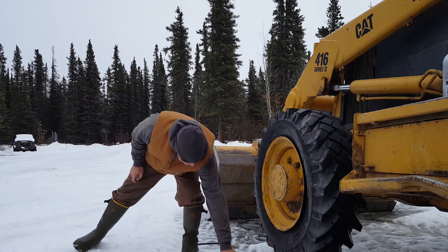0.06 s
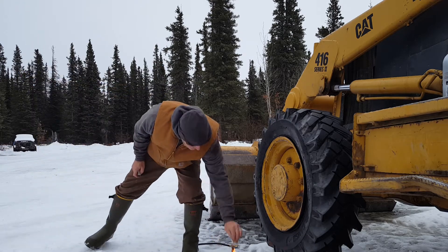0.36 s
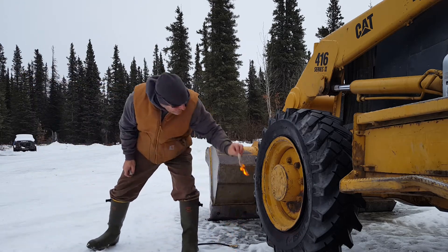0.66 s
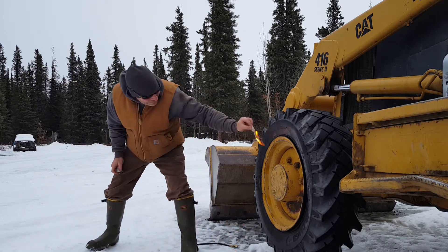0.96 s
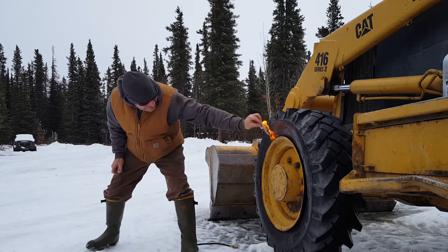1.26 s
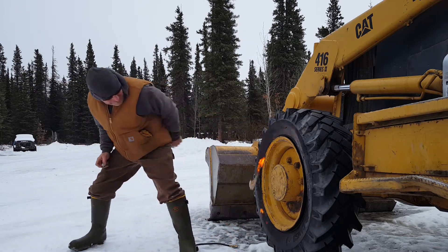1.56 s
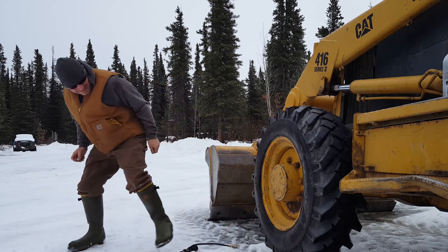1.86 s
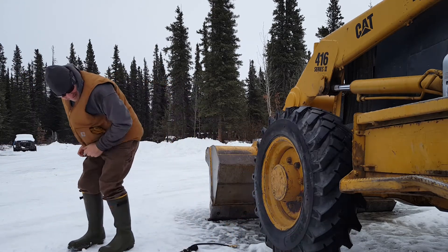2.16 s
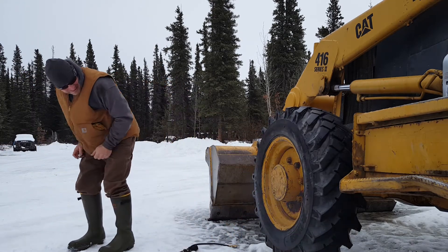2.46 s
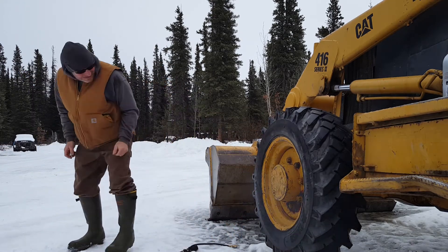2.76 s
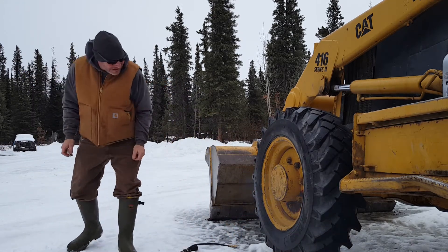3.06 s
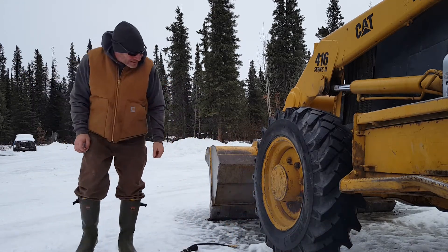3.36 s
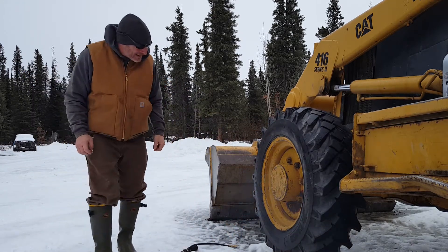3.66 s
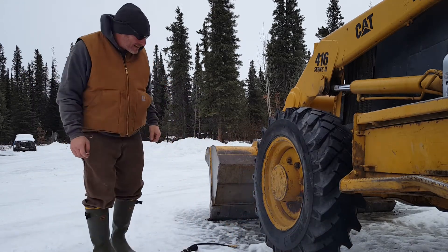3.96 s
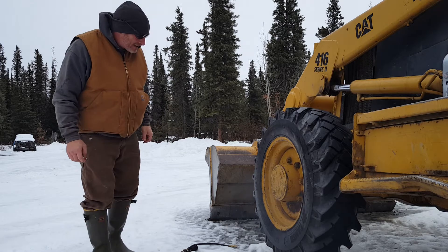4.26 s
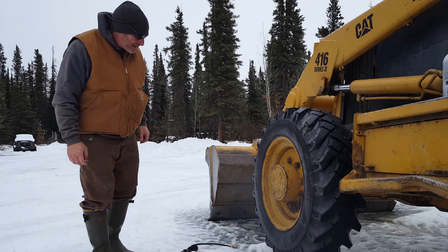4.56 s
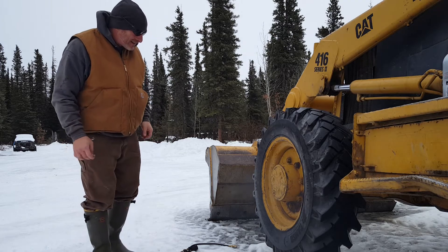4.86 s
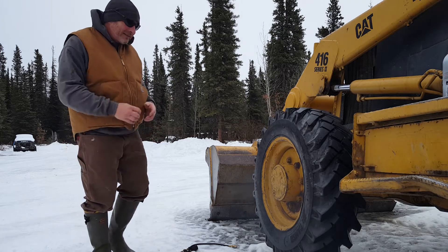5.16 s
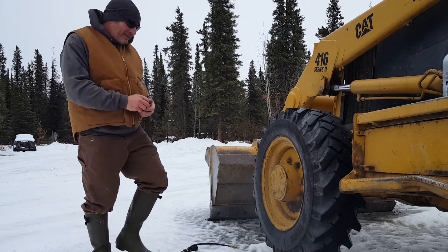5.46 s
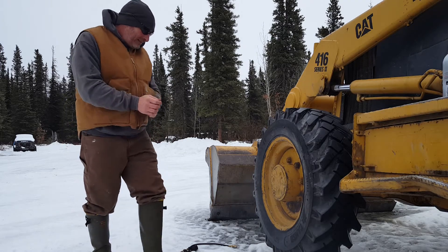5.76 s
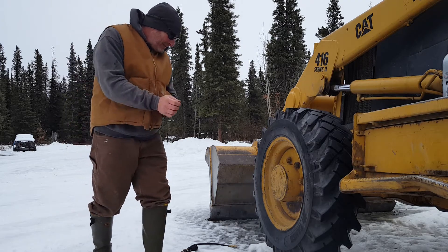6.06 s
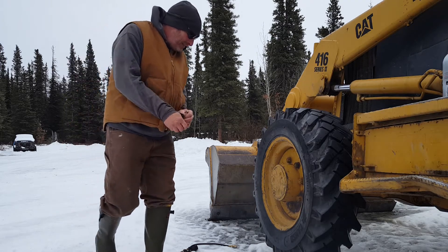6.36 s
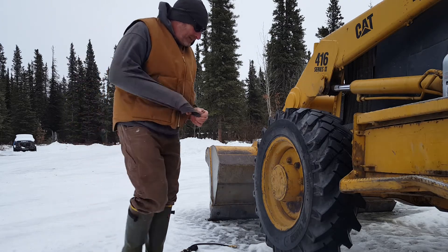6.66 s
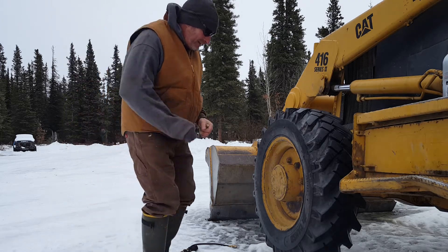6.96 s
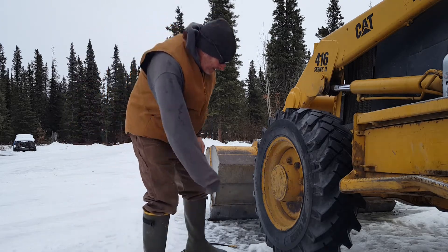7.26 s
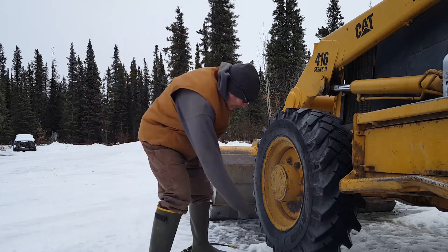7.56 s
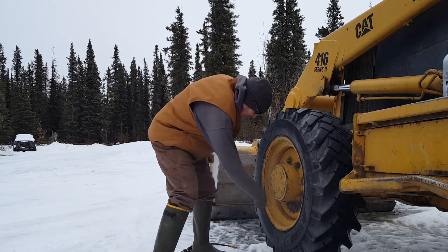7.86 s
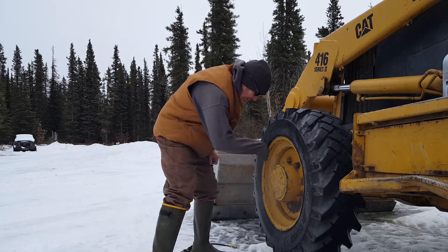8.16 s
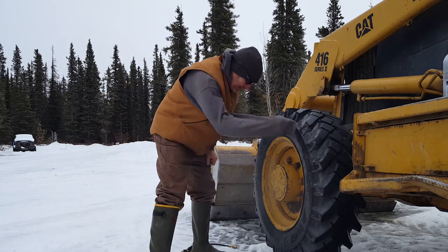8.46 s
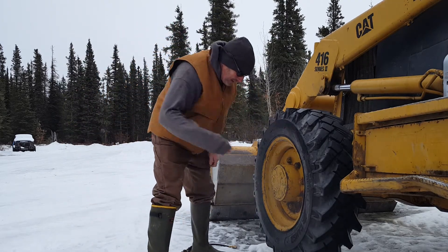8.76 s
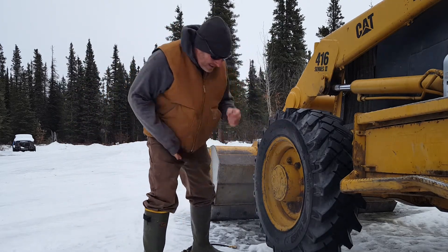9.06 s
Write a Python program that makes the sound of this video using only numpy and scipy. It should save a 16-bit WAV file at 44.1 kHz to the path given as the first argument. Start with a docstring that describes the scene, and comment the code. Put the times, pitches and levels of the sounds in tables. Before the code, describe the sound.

Vapour in a large tire ignites with a whump and a sputtering roar, then air hisses out of the valve and slowly fades.

```python
"""A snowy lot, where ether is lit in a loader tire. The flame catches with a flutter and soft pops and
goes up with a whump; gas roars out past the loose bead and sputters as the bead seats on the rim.
Then the tire blows down through its open valve stem: a long, sizzling hiss over low eddies that fades
to a thin whistle. Boots tread the snow and work clothes rustle close by, over faint outdoor air."""
import sys
import numpy as np
from scipy import signal
from scipy.fft import rfft, irfft, next_fast_len
from scipy.io import wavfile
from scipy.ndimage import map_coordinates

SR = 44100
rng = np.random.default_rng(int(sys.argv[2]) if len(sys.argv) > 2 else 0)


def generate_wav(sig):
    """Save sig (samples, or channels by samples) to the path in sys.argv[1] as 16-bit PCM at SR."""
    pcm = np.round(np.clip(np.atleast_2d(sig).T, -1, 1) * 32767).astype(np.int16)
    wavfile.write(sys.argv[1], SR, pcm)


N = 406602

# tone colours of the noise layers: freq_hz, gain_db
AIR_TONE = [(25, -3), (85, 2.5), (200, -10.5), (800, -10), (2500, -18.5), (6000, -30), (15500, -28)]
GRAIN_TONE = [(25, -1), (90, 1.5), (250, 3), (450, -4.5), (750, -8), (1300, -9), (3000, -29.5), (8000, -39),
              (15500, -39.5)]
RUSTLE_TONE = [(300, -23), (1500, -7), (4000, 3), (8000, 0), (15500, -18)]
SLEEVE_TONE = [(400, -8), (1000, -18), (1500, -3.5), (3200, -4), (4300, -10), (6000, -12), (15500, -32)]
SNAP_TONE = [(800, -20), (2600, 0), (5000, -6), (8000, -7), (15500, -20)]
EDDY_TONE = [(25, -17), (60, -10), (110, -1), (300, -0.5), (500, 2.5), (1200, -27), (5000, -60)]
ROAR_TONE = [(30, -32.5), (100, -14.5), (220, -12), (400, 3.5), (800, -0.5), (1500, -1.5), (2800, -5),
             (5000, -8.5), (8000, -19.5), (15500, -14.5)]
HISS_TONE = [(60, -33.5), (330, -14), (560, -10.5), (900, -3.5), (1500, -2), (3000, 1), (5300, -1),
             (5750, 2.5), (6700, 0.5), (9000, 0), (13700, -10), (15500, -6.5)]
# stereo images of direct and scattered sound: freq_hz, left_right_likeness
DIRECT_IMAGE = [(100, .7), (700, 0.9), (2500, 0.74), (5800, 0.76), (7500, 0.75), (10000, 0.99), (14000, .3)]
SCATTERED_IMAGE = [(100, 0.36), (400, .1), (3000, 0.29), (8000, 0.16), (13000, .1)]
# resonances of knocks and pops, a hollow ring, footfalls, wheel dish, stem: pitch_hz, width_hz, gain_db
KNOCK_POP_MODES = [(328, 620, 1.5), (604, 360, 6), (1160, 480, -10), (1827, 390, -10), (2966, 650, -23.5)]
HOLLOW_MODES = [(612, 100, 0)]
STEP_MODES = [(114, 74, -3), (200.6, 104, 1.5), (305, 140, 2.5)]
DISH_MODES = [(575, 137, -1), (930, 200, 0.1)]
STEM_MODES = [(2250, 260, -13), (3110, 98, -3.5), (3866, 160, -0.5), (5020, 600, -5)]
# the stem's antiresonances: pitch_hz, width_hz, strength_db
STEM_NOTCHES = [(1610, 67, -16.5), (3410, 210, -7), (4740, 110, -21), (5690, 260, -3.5)]

# scuffs over the snow and, from 1.35 to 1.7 s, the flutter of the flame catching at the tire:
# start_s, length_s, grain_db, rustle_db, hollow_db
SCUFFS_AND_FLUTTER = [(.01, 0.011, -55.5, -63, -65), (0.143, 0.079, -62, -68, -69),
                      (0.33, 0.063, -62, -67, -63), (0.514, 0.06, -61, -77, -73), (.62, .11, -64, -79, -71),
                      (1.363, 0.046, -56, -80, -63.5), (1.465, 0.019, -62, -81, -60),
                      (1.517, 0.1, -55, -65, -66.5), (1.639, 0.06, -55.5, -79, -70),
                      (8.704, 0.24, -70, -83, -80), (8.964, 0.31, -65.5, -74.5, -79)]
# knocks of boots and hands and, from 1.35 to 1.5 s, soft pops of the flame catching:
# start_s, peak_db, thud_db, snap_db, crunch_amount
KNOCKS_AND_POPS = [(0.025, -38.5, -57, -66, 0.07), (0.031, -33.5, -60, -72, 0.22),
                   (0.585, -48, -49, -70, 0.1), (0.621, -44, -60, -70, 0.1), (0.627, -37.5, -57, -59, 0.2),
                   (0.675, -38.5, -49, -69, 0.1), (0.716, -41.5, -50, -61, .16),
                   (0.959, -33, -52, -61, 0.07), (0.967, -31, -52, -64, 0.05),
                   (0.97, -35.5, -46, -64, 0.14), (1.354, -37, -44, -62, .1), (1.387, -43, -52, -76, 0.1),
                   (1.396, -45, -46, -78, 0.2), (1.452, -39, -36, -72, .1), (1.482, -45, -47, -72, 0),
                   (8.419, -47, -36.5, -70, 0), (8.903, -32.5, -36, -60, 0.15)]
# dull footfalls and bumps: start_s, peak_db
FOOTFALLS = [(0.474, -53), (0.56, -55), (3.37, -25.5), (3.41, -31), (4.294, -32.5), (5.906, -29.5),
             (6.003, -33), (6.806, -32), (6.838, -37), (7.437, -31.5), (7.48, -31.5), (7.535, -38)]
# where the small sounds are heard, 1 off to the left and 0 at the wheel: time_s, left_share
FOLEY_PLACE = [(1.15, 1), (1.25, 0), (8.55, 0), (8.65, 1)]
# puffs of flame before the blast: peak_s, level_db, half_length_s, centre_hz, width_hz
FLAME_PUFFS = [(1.353, -68, 0.0026, 3990, 5000), (1.593, -50.5, 0.0037, 3204, 7000),
               (1.65, -52, 0.0013, 1700, 2200), (1.675, -60.5, 0.0017, 4500, 6000),
               (1.69, -41, 0.0026, 1320, 350), (1.692, -50, 0.013, 2620, 2190)]
# whumps of the burning vapour and, from 2.29 s, low thumps as the gap at the rim sputters shut:
# start_s, level_db, pitch_hz, t60_s
WHUMPS_AND_THUMPS = [(1.687, -17, 110, 0.026), (1.736, -24.5, 110, 0.04), (1.769, -13, 107.6, 0.16),
                     (1.7909, -2, 174, 0.038), (1.836, -11.5, 360, 0.098), (2.293, -27.5, 115, 0.04),
                     (2.336, -24, 114, 0.03), (2.529, -25, 110, 0.043)]
# the gap at the rim spits as it opens and closes: start_s, peak_db
GAP_SPITS = [(1.736, -21), (2.188, -4), (2.259, -9), (2.37, -14), (2.456, -9.5), (2.503, -15.5),
             (2.596, -14), (2.62, -13), (2.752, -12), (2.781, -16), (2.816, -9.5), (2.838, -16.5)]
# the bead lifts off the rim again before it seals: start_s, length_s, level_db
BEAD_BURPS = [(2.326, 0.066, -23), (2.45, 0.022, -24), (2.493, 0.08, -25), (2.596, 0.033, -23),
              (2.671, .04, -28), (2.75, 0.01, -22), (2.8, 0.0086, -28), (2.828, 0.01, -29)]
# swells of the stem's whistle: peak_s, half_length_s, pitch_hz, level_db, half_width_hz
WHISTLE_SWELLS = [(3.042, 0.2, 3160, -31, 130), (5.58, 0.32, 3820, -38, 111),
                  (8.19, 0.34, 4380, -52.5, 300), (8.33, 0.12, 4410, -52, 70), (8.734, .045, 3970, -70, 35),
                  (8.85, 0.13, 3850, -76.5, 70), (8.933, .04, 3890, -75, 30),
                  (9.06, 0.12, 3880, -68.5, 31.9)]
# the course of the stem's sizzle: time_s, level_db, centre_hz, narrow_share
SIZZLE_CURVE = [(2.3, -32.5, 7710, .3), (2.6, -28, 7720, 0.75), (3.1, -33, 7720, 0.86),
                (3.6, -30.5, 7720, 0.33), (4.3, -26.5, 7706, .2), (4.9, -28.5, 7750, 0.08),
                (5.349, -25.5, 7760, 0.093), (6.1, -32, 7830, .1), (7.001, -39, 7810, 0.11),
                (7.4, -40, 7940, 0.09), (7.851, -40, 8210, 0.12), (8.15, -44, 8240, 0.26),
                (8.4, -56, 8200, .2)]
# the jet's bright crest, a broad band and a narrow one that outlasts it:
# half_width_hz, top_db, knee_db, loss_db_per_flow_db
CREST_BANDS = [(2300, -31, -29.5, 1.5), (560, -45, -41, 2)]
# the glide of that crest: time_s, centre_hz
CREST_GLIDE = [(4.4, 12900), (5.3, 12420), (6.1, 11930), (6.8, 11220), (7.3, 11200), (7.8, 11800),
               (8.2, 12000)]
# flow through the stem while the tire is still full: time_s, flow_db
FULL_FLOW = [(2.9, -26), (3.27, -28), (4.49, -30), (5.56, -30), (6.4, -31.5)]
# the microphone's ports ring near 8 kHz: freq_hz, gain_db
PORT_TONE = [(5800, 1), (6500, 2), (7300, 7.5), (7900, 12.5), (8400, 7.5), (9100, -4), (10200, -7.5),
             (11800, 2), (15500, 0)]
# tilt between the two ports: freq_hz, left_over_right_db
PORT_TILT = [(2000, 0.5), (4000, -1), (8000, 0.5), (13000, -1.9)]

# gas first leaks, then blasts the gap open; the bead hits the rim, then seals
LEAK_S, BLAST_S, SEAT_S, SEAL_S = 1.754, 1.827, 2.385, 2.843
EMPTY_S, CLOSE_S = 8.445, 0.17  # the jet gives out; the time it then takes to fall 20 dB


def amp(db):
    """Decibels as a gain."""
    return 10 ** (np.asarray(db) / 20)


def unit(x):
    """x at rms 1."""
    return x / np.sqrt(np.mean(x ** 2) + 1e-20)


def along(points, hz):
    """A curve through (freq_hz, value) points on a log axis."""
    freqs, values = np.transpose(points)
    return np.interp(np.log(hz + 1), np.log(freqs + 1), values)


def colour(points):
    """An EQ curve through (freq_hz, gain_db) points."""
    return lambda hz: amp(along(points, hz))


def resonances(modes):
    """The response of (pitch_hz, width_hz, gain_db) modes, summed with alternating polarity."""
    return lambda hz: sum((-1) ** k * amp(db) * 1j * hz * width / (pitch**2 - hz**2 + 1j * hz * width)
                          for k, (pitch, width, db) in enumerate(modes))


def clock():
    """The time of each sample in seconds."""
    return np.arange(N) / SR


def envelope(start, length, rise, fall):
    """Gain 1 for length seconds; it climbs 20 dB per rise before and sinks 20 dB per fall after."""
    t = clock()
    return amp(-20 * (np.maximum(start - t, 0) / rise + np.maximum(t - start - length, 0) / fall))


def sinking(start, db_per_s):
    """Gain 1 until start, then a steady decay."""
    return amp(-db_per_s * np.maximum(clock() - start, 0))


def driven(flow_db, top_db, knee_db, slope):
    """A gain that holds its top while the flow is above the knee and loses slope dB per dB below."""
    return amp(top_db + slope * np.minimum(flow_db - knee_db, 0))


def wobble(rate):
    """A smooth random curve, rate knots a second."""
    return map_coordinates(rng.standard_normal(int(N * rate / SR) + 4), [np.arange(N) * rate / SR])


def filtered(x, response):
    """x through a complex frequency response."""
    size = x.shape[-1]
    padded = next_fast_len(size + SR // 4)
    return irfft(rfft(x, padded) * response(np.fft.rfftfreq(padded, 1 / SR)), padded)[..., :size]


def rush(response, image):
    """Coloured stereo noise of rms 1; image gives its left-right likeness over frequency."""
    def mid_side(hz):
        angle = np.arccos(np.clip(along(image, hz), -1, 1)) / 2
        return response(hz) * np.array([np.cos(angle), np.sin(angle)])
    mid, side = filtered(rng.standard_normal((2, N)), mid_side)
    return unit(np.array([mid + side, mid - side]))


def gliding(centre_hz, half_width_hz, alike):
    """A band of noise of rms 1 around a moving centre."""
    band = rush(lambda hz: 1 / (1 + (hz / half_width_hz) ** 2), [(100, alike)])
    return unit(band * np.cos(2 * np.pi * np.cumsum(centre_hz) / SR))


def add(track, start, sound):
    """Mix a sound in at start seconds."""
    part = track[..., max(round(start * SR), 0):][..., :sound.shape[-1]]
    part += sound[..., :part.shape[-1]]


def hit(modes, t60, grit):
    """An impulse with a gritty tail rings a body's resonances, peak 1."""
    t = np.arange(SR // 5) / SR
    force = grit * rng.standard_normal((2, len(t))) * amp(-60 * t / t60)
    force[:, 0] += 1
    sound = filtered(force, resonances(modes))
    return sound / np.abs(sound).max()


def push(hz, t60, attack=0.0013):
    """A heavily damped low swing of pressure."""
    t = np.arange(SR // 4) / SR
    return -np.sin(2 * np.pi * hz * t) * amp(-60 * t / t60) * (1 - np.exp(-t / attack))


def outdoor_air():
    """A faint, dark bed of open air."""
    return amp(-65) * rush(colour(AIR_TONE), [(60, 0.59), (2000, 0.26)])


def knocks_and_pops(snap_t60=0.025, heel_db=-13):
    """Boots and hands knock and the catching flame pops: snap, crunch, thud. Dull steps land on snow."""
    out = np.zeros((2, N))
    t = np.arange(SR // 20) / SR
    for start, db, thud_db, snap_db, crunch in KNOCKS_AND_POPS:
        snap = unit(filtered(rng.standard_normal((2, len(t))), colour(SNAP_TONE)))
        add(out, start, amp(snap_db - 60 * t / snap_t60) * snap)
        add(out, start, amp(db) * hit(KNOCK_POP_MODES, t60=0.032, grit=crunch))
        add(out, start, amp(thud_db) * push(hz=113, t60=0.083))
    for start, db in FOOTFALLS:
        add(out, start, amp(db) * hit(STEP_MODES, t60=0.15, grit=0.092))
        add(out, start, amp(db + heel_db) * push(hz=83.5, t60=0.072, attack=0.0043))
    return out


def scuffs_and_flutter():
    """Grainy swells: boots scuff, clothes rustle, the flame flutters; a sleeve brushes the wheel."""
    out = np.zeros((2, N))
    grains = amp(2.3 * wobble(60) + 3.6 * np.tanh(wobble(420)))
    grainy = unit(rush(colour(GRAIN_TONE), [(100, 0.96)]) * grains)
    hollow = unit(filtered(rush(colour(GRAIN_TONE), [(100, 0.8)]) * grains, resonances(HOLLOW_MODES)))
    rustle = unit(rush(colour(RUSTLE_TONE), [(100, 0.33)]) * amp(2.3 * wobble(190)))
    for start, length, grain_db, rustle_db, hollow_db in SCUFFS_AND_FLUTTER:
        body = amp(grain_db) * grainy + amp(hollow_db) * hollow
        out += envelope(start, length, rise=0.056, fall=0.085) * body
        out += amp(rustle_db) * envelope(start, length, rise=0.074, fall=0.082) * rustle
    sleeve = rush(colour(SLEEVE_TONE), DIRECT_IMAGE)
    return out + amp(-47) * envelope(8.374, length=0.042, rise=0.094, fall=0.046) * sleeve


def foley(left_lead_s=0.000217):
    """Small sounds of the worker and the catching flame; those off to the left reach that side first."""
    small = knocks_and_pops() + scuffs_and_flutter()
    left_share = np.interp(clock(), *np.transpose(FOLEY_PLACE))
    from_left = lambda hz: np.exp(1j * np.pi * hz * left_lead_s * np.array([[1], [-1]]))
    return (1 - left_share) * small + filtered(left_share * small, from_left)


def eddies(gap_db=-36.5, jet_db=-42):
    """The escaping gas rumbles: strongly until the bead seals, then ever less as the tire empties."""
    at_gap = amp(gap_db) * envelope(BLAST_S, SEAL_S - BLAST_S, rise=0.12, fall=0.12)
    in_jet = amp(jet_db) * envelope(SEAL_S, EMPTY_S - SEAL_S, rise=0.1, fall=CLOSE_S)
    in_jet *= sinking(SEAL_S, db_per_s=4.5)
    return np.hypot(at_gap, in_jet) * amp(2.5 * wobble(25)) * rush(colour(EDDY_TONE), [(100, 0.42)])


def whistle(depth_db=12.5, bend_hz_per_db=9, wander_hz=18):
    """The stem sings in faint swells that bend its pitch: airy in the jet, thin on the last air."""
    out = np.zeros((2, N))
    for peak_s, half_s, hz, db, half_width_hz in WHISTLE_SWELLS:
        swell_db = -depth_db * np.minimum(((clock() - peak_s) / half_s) ** 2, 2)
        pitch = hz + bend_hz_per_db * swell_db + wander_hz * wobble(28)
        gate = envelope(peak_s - half_s, 2 * half_s, rise=half_s, fall=0.035)
        out += amp(db + swell_db) * gate * gliding(pitch, half_width_hz, alike=0.63)
    return out


def sizzle(spurt_db=-21.5):
    """The stem sizzles in a spurt at ignition, then on from the seating: keen first, later airy."""
    times, *columns = np.transpose(SIZZLE_CURVE)
    level_db, centre_hz, narrow_share = [np.interp(clock(), times, column) for column in columns]
    steady = amp(level_db) * envelope(SEAT_S, EMPTY_S - SEAT_S, rise=0.3, fall=0.11)
    spurt = amp(spurt_db) * envelope(1.775, length=0.065, rise=0.022, fall=0.14)
    pitch = centre_hz + 110 * wobble(6)
    airy = np.sqrt(1 - narrow_share) * gliding(pitch, half_width_hz=1310, alike=0.86)
    keen = np.sqrt(narrow_share) * gliding(pitch, half_width_hz=160, alike=0.96)
    return (steady + spurt) * amp(0.32 * wobble(22)) * (airy + keen)


def crest(flow_db):
    """The jet's top sheen fades in, glides down and lifts at the end; it narrows as the flow drops."""
    centre_hz = np.interp(clock(), *np.transpose(CREST_GLIDE))
    bands = [driven(flow_db, top_db, knee_db, slope) * gliding(centre_hz, half_width_hz, alike=0.3)
             for half_width_hz, top_db, knee_db, slope in CREST_BANDS]
    return envelope(4.6, length=3.7, rise=3.2, fall=0.4) * sum(bands)


def stem_flow(drain_s=6.025, flat_s=8.65, power=1.66, trickle_db=-61.5):
    """The flow in dB: nearly steady, then falling ever faster to a trickle as the tire empties."""
    share_left = np.clip((flat_s - clock()) / (flat_s - drain_s), 1e-3, 1)
    full_db = np.interp(clock(), *np.transpose(FULL_FLOW))
    return np.maximum(full_db + 20 * power * np.log10(share_left), trickle_db)


def stem_hiss(flow_db, echo_s=0.001372, dulling=0.39, gain_db=6, full_flow_db=-26):
    """A broad hiss, coloured by the stem and combed by its echo off the wheel, dulls as it weakens."""
    comb = lambda hz: 1 + 0.2 * np.exp(-2j * np.pi * hz * echo_s - (hz / 6000) ** 2)
    peaks = lambda hz: sum(resonances([mode])(hz) for mode in STEM_MODES)
    notches = lambda hz: sum(resonances([notch])(hz) for notch in STEM_NOTCHES)
    pipe = lambda hz: 1 + 0.5 * peaks(hz) - notches(hz)
    noise = rush(lambda hz: colour(HISS_TONE)(hz) * comb(hz) * pipe(hz), DIRECT_IMAGE)
    body = filtered(noise, lambda hz: 1 / (1 + (hz / 8500) ** 4))
    treble = (noise - body) * amp(dulling * (flow_db - full_flow_db))
    return amp(flow_db + gain_db) * (body + treble)


def colour_drift(jet, depth_db=1.5, patch_hz=170, patch_s=0.5):
    """A slow random drift of the hiss's colour: patches of it swell and fade, most up high."""
    hz, t, spectrum = signal.stft(jet, SR, nperseg=1024)
    grid = np.meshgrid(hz / patch_hz, t / patch_s, indexing="ij")
    patches = map_coordinates(rng.standard_normal((160, 160)), grid, mode="mirror")
    swing_db = depth_db * np.clip(hz / 6500, 0, 1)[:, None]
    drift = amp(swing_db * patches - swing_db ** 2 * np.log(10) / 20)  # keeps the mean power
    return signal.istft(spectrum * drift, SR, nperseg=1024)[1][:, :N]


def valve_jet():
    """The tire blows down through its stem: hiss, crest, sizzle and a hollow note in the wheel dish."""
    flow_db = stem_flow()
    pressure = np.clip((clock() - 1.76) / 0.077, 0, 1)  # builds up within the burn
    hiss = stem_hiss(flow_db)
    dish = rush(lambda hz: resonances(DISH_MODES)(hz) / (1 + (hz / 1300) ** 4), [(700, 0.99)])
    hollow = driven(flow_db, top_db=-41, knee_db=-35.5, slope=0.86) * dish
    jet = colour_drift(pressure * (hiss + hollow + crest(flow_db)) + sizzle())
    return jet * envelope(LEAK_S, EMPTY_S - LEAK_S, rise=0.014, fall=CLOSE_S) * amp(0.58 * wobble(35))


def bead_roar(leak_db=-22, blast_db=-15, burn_s=0.29, chuff_db=-10.5, swell_db=3.5):
    """Gas roars past the bead while the vapour burns, then chuffs and sputters as the gap closes."""
    t = clock()
    leak = amp(leak_db) * envelope(LEAK_S, SEAL_S - LEAK_S, rise=0.022, fall=0.1)
    leak *= sinking(LEAK_S, db_per_s=11)
    blast = amp(blast_db) * envelope(BLAST_S, SEAT_S - BLAST_S, rise=0.011, fall=0.049)
    blast *= sinking(BLAST_S + burn_s, db_per_s=27.5)
    burps = np.linalg.norm([amp(db) * envelope(start, length, rise=0.012, fall=0.022)
                            for start, length, db in BEAD_BURPS], axis=0)
    gap_flow = np.linalg.norm([leak, blast, burps], axis=0)
    ragged_db = np.interp(t, [1.95, 2.6], [1.8, 3.3])
    sputter = amp(ragged_db * wobble(230) - ragged_db ** 2 * np.log(10) / 20)  # keeps the mean power
    fullness = amp(swell_db * np.interp(t, [BLAST_S, BLAST_S + burn_s / 2, SEAT_S], [-0.2, 0.4, 0]))
    brightness = amp(np.interp(t, [1.8, 2.1, 2.8], [2.5, -0.5, -5]))
    roar = rush(colour(ROAR_TONE), SCATTERED_IMAGE)
    body = filtered(roar, lambda hz: 1 / (1 + (hz / 2200) ** 4))
    out = gap_flow * (body * sputter * fullness + (roar - body) * brightness)
    chuff_eq = colour([(30, -10.5), (110, -3), (250, -3), (500, -5.5), (1200, -29.5)])
    out += amp(chuff_db) * burps * rush(chuff_eq, [(100, 0.26)])
    spit_modes = [(230, 250, 2.5), (556, 270, 9.5), (1500, 910, -16)]
    for start, db in GAP_SPITS:
        add(out, start, amp(db) * hit(spit_modes, t60=0.022, grit=0.39))
    return out


def ignition_and_thumps(boom_db=-25):
    """Small flares, then the flame front whumps over a deep boom; the gap thumps as it sputters shut."""
    out = np.zeros((2, N))
    t = np.arange(SR // 10) / SR - 0.05  # centred on the puff
    for peak_s, db, half_s, centre_hz, width_hz in FLAME_PUFFS:
        band = resonances([(centre_hz, width_hz, 0)])
        puff = unit(filtered(rng.standard_normal((2, len(t))), lambda hz: band(hz) ** 2))
        add(out, peak_s + t[0], amp(db) * puff * np.exp(-(t / half_s) ** 2 / 2))
    for start, db, hz, t60 in WHUMPS_AND_THUMPS:
        add(out, start, amp(db) * push(hz, t60))
    boom = rush(colour([(20, -15.5), (45, -14.5), (120, -4.5), (300, -8), (900, -42)]), [(100, 0.44)])
    return out + amp(boom_db) * boom * envelope(1.773, length=0.075, rise=0.047, fall=0.081)


def scene():
    """The blast and the long blow-down in front, the small sounds and the open air behind."""
    tire = ignition_and_thumps() + bead_roar() + valve_jet() + eddies() + whistle()
    return tire + foley() + outdoor_air()


def record(dry, right_lead_s=6.6e-5, low_cut_hz=42, top_hz=15850):
    """The microphone's ports ring, the right one leading; lows are cut, peaks rounded, the top shorn."""
    sides = np.array([[1], [-1]])
    balance = lambda hz: amp(sides * along(PORT_TILT, hz) / 2)
    delay = lambda hz: np.exp(-1j * np.pi * hz * right_lead_s * sides)
    low_cut = lambda hz: hz ** 2 / (hz ** 2 + low_cut_hz ** 2)
    heard = filtered(dry, lambda hz: colour(PORT_TONE)(hz) * balance(hz) * delay(hz) * low_cut(hz))
    rounded = heard / (1 + np.abs(heard) ** 6) ** (1 / 6)
    return filtered(rounded, lambda hz: np.clip((top_hz - hz) / 120 + 0.5, 0, 1))


dry = scene()
out = record(dry)
generate_wav(out)
```